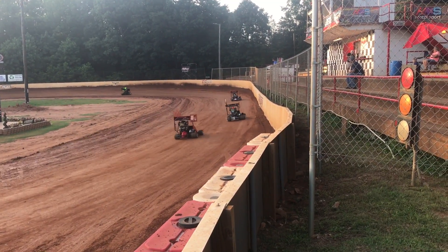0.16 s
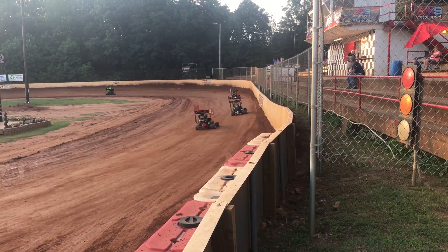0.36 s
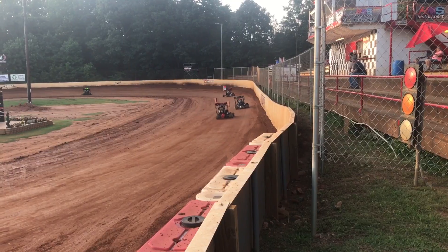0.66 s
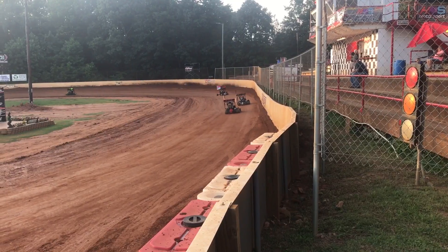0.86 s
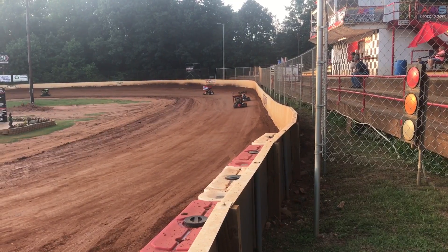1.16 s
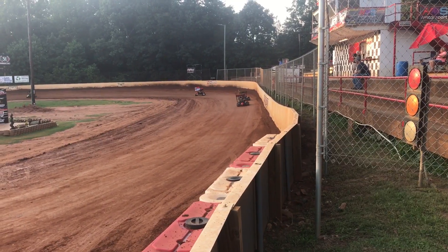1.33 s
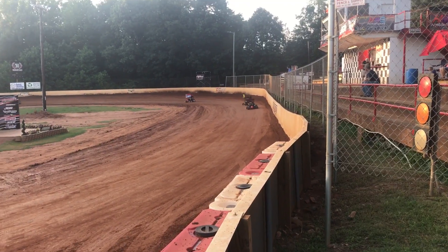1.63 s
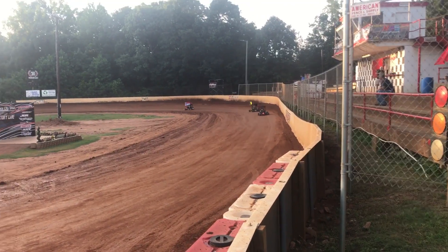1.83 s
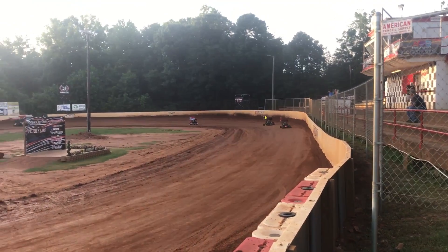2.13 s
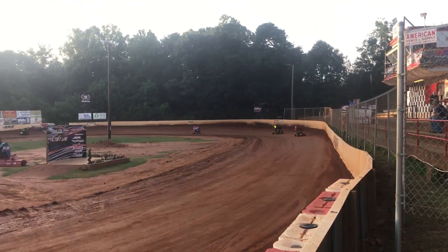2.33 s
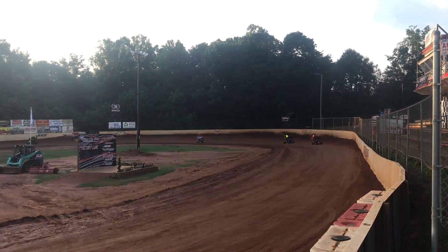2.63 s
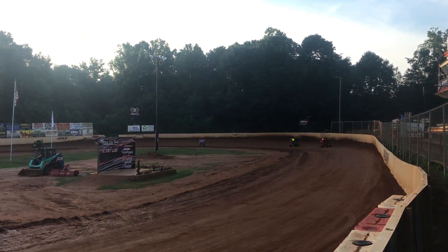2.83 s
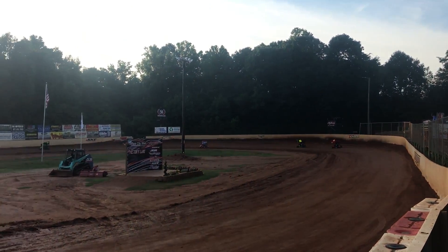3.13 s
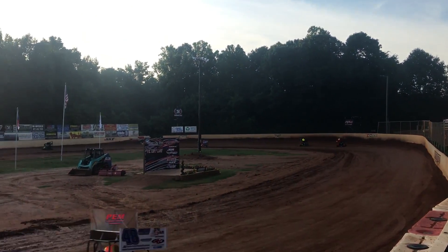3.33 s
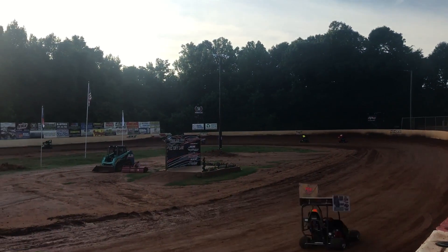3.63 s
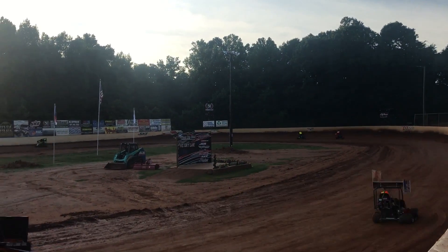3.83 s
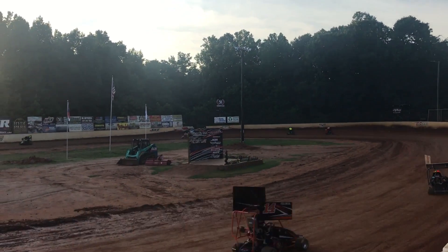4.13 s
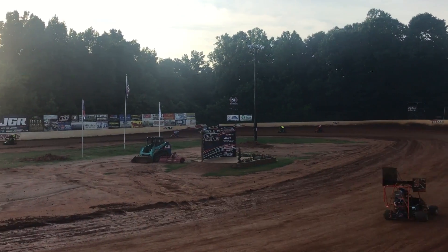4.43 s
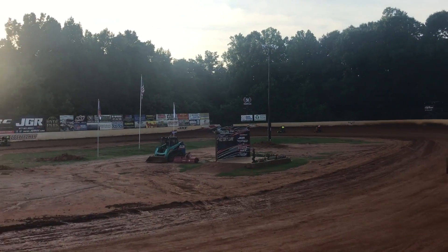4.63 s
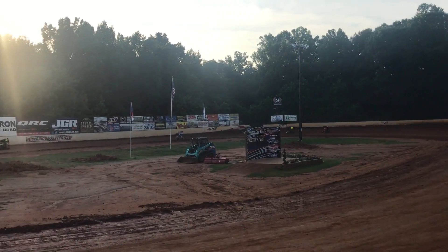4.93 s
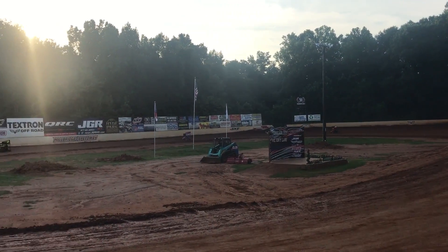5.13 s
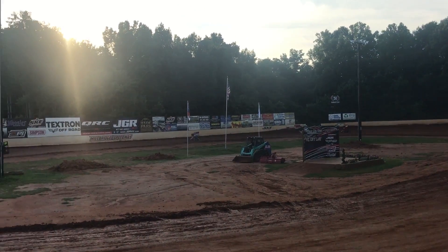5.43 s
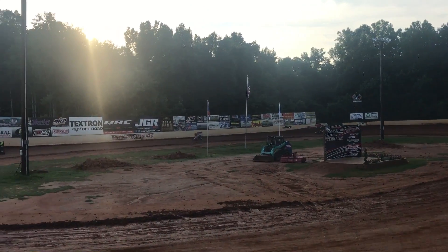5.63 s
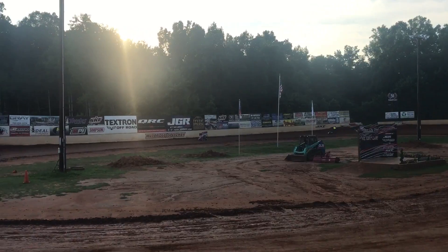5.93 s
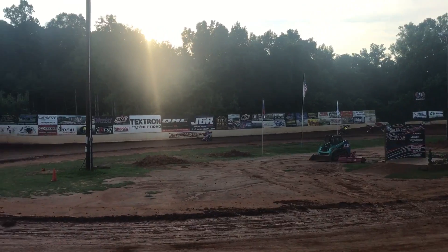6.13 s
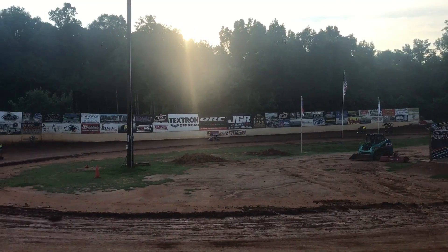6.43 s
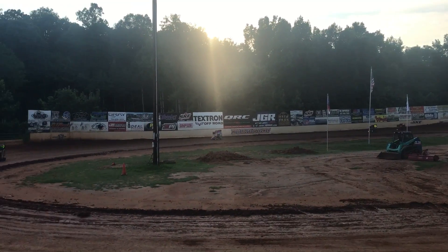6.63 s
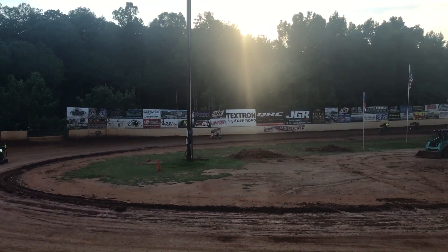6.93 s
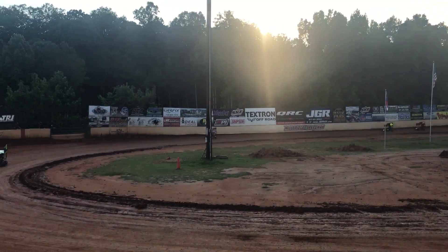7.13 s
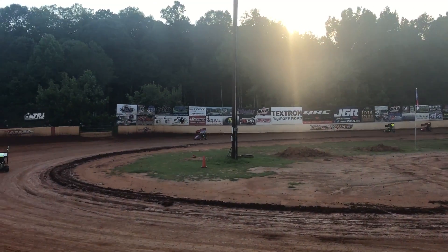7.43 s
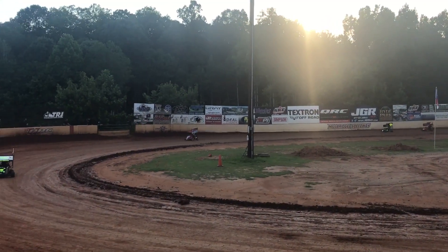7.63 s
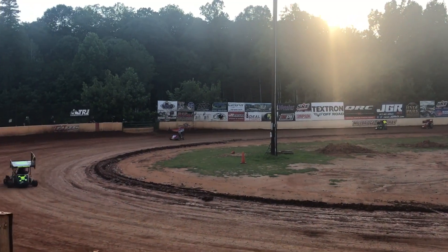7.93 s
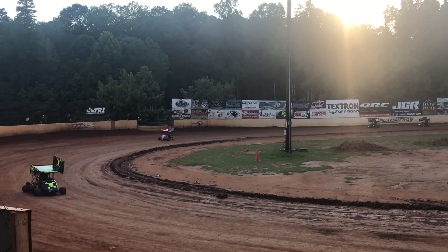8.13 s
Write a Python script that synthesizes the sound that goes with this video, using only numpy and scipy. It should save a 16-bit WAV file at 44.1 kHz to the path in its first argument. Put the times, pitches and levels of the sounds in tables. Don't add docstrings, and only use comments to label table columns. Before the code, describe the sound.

Harsh, rasping small-engine drone of karts lapping outdoors, swelling and easing as they pass the fence, abruptly cut by a short silent gap.

```python
import sys
import numpy as np
from scipy import signal
from scipy.io import wavfile
from scipy.ndimage import uniform_filter1d

SR = 44100
rng = np.random.default_rng(int(sys.argv[2]) if len(sys.argv) > 2 else 0)


def digitize_waveform(pressure):
    field = np.atleast_2d(pressure).T
    bounded = np.clip(field, -1, 1)
    quanta = np.round(bounded * 32767).astype(np.int16)
    wavfile.write(sys.argv[1], SR, quanta)


def to_linear_factor(level_db):
    exponent = np.asarray(level_db, float) / 20
    return 10 ** exponent


N = 365148
TIME = np.arange(N) / SR


def unit(x):
    return x / np.sqrt(np.mean(x ** 2) + 1e-20)


def drift(rate_hz, count=1, size=N):
    hop = 64
    r = np.exp(-2 * np.pi * rate_hz * hop / SR)
    noise = rng.standard_normal((count, N // hop + 1002))
    slow = signal.lfilter([1], [1, -2 * r, r * r], noise)[:, 1000:]
    return np.array([np.interp(np.arange(size) / hop, np.arange(len(s)), unit(s)) for s in slow])


def outdoors(x):
    dull = signal.lfilter([.1], [1, -.9], x)
    echoes = [(.041, -36), (.113, -32), (.237, -30.5)]   # lag/s, level/dB
    return x + sum(to_linear_factor(db) * np.interp(TIME - lag_s, TIME, dull) for lag_s, db in echoes)


def roar(jet, crack_db=8.0, low_share=0.32, patchy_db=2.0):
    # t/s, loudness/dB, closeness/dB
    pack = [(0, -24.5, 0), (.15, -29, 1.5), (.65, -22.5, -3.5), (1.02, -27, -2.5), (1.97, -20.5, -4),
            (2.2, -25.5, -1.5), (2.5, -26, -4), (2.85, -22, -5), (3.35, -18.5, -2), (3.55, -22, -1.5),
            (4.2, -22, -1.5), (4.5, -26.5, -0.5), (5.1, -25.5, -2), (5.66, -24.5, -2), (6.5, -27, -1.5),
            (7.3, -28.5, -5.5), (7.9, -28, -5.5), (8.28, -25.5, -4)]
    # level over loudness/dB, share of its swing/1, share of closeness/1
    band_rules = [(-1.5, 0.34, 0), (-0.5, 1, 0), (0.5, 0.51, 1.47), (-2.5, 0.88, 1.05), (-5, 1.05, 2.8)]
    roar_hz = [250, 1100, 5000, 9500, 15000]
    # f/Hz, level within its band/dB
    roar_shape = [(30, -21), (100, 2), (250, 7.5), (500, -4), (1300, -6), (2500, -8.5), (6400, -5.5),
                  (16000, -1)]
    # f/Hz, width/Hz, level/dB
    pipe_rings = [(2900, 1100, 2), (6100, 1200, 3), (1400, 500, -8)]
    air_share = .35
    plain_db = -5
    jet_evened = 0.3

    s, loud_db, close_db = np.transpose(pack)
    mean_db = loud_db.mean()
    levels_db = []
    for db, swing, share in band_rules:
        band_db = db + mean_db + swing * (loud_db - mean_db) + share * close_db
        levels_db.append(np.interp(TIME, s, band_db))

    shape_hz, shape_db = np.transpose(roar_shape)
    edges = 15 * 2 ** np.arange(0, 10.4, 1 / 3)
    white = rng.standard_normal((2, N))
    patches = drift(2.58, count=7)
    groups = np.zeros((5, N))
    for k, (low, high) in enumerate(zip(edges, edges[1:])):
        third = signal.butter(2, [low, high], "band", fs=SR, output="sos")
        band = signal.sosfilt(third, white[k % 2])
        place = np.log(low * high) / 2
        band = band * to_linear_factor(np.interp(place, np.log(shape_hz), shape_db) + patchy_db * patches[k % 7])
        for g in range(5):
            groups[g] += np.interp(place, np.log(roar_hz), np.arange(5) == g) * band

    out = 0
    for g, share in enumerate([0, low_share, 1, air_share, air_share]):
        steady = unit(groups[g])
        other = np.roll(steady, N // 3)
        rings = 0
        for hz, width_hz, db in pipe_rings:
            b, a = signal.iirpeak(hz, hz / width_hz, fs=SR)
            rings = rings + to_linear_factor(db) * signal.lfilter(b, a, other)
        burst = share * to_linear_factor(crack_db) ** 2 * jet
        mix = steady + np.sqrt(burst) * unit((g < 3) * rings + to_linear_factor(plain_db) * other)
        evened = np.sqrt(1 + jet_evened * uniform_filter1d(burst, size=6000))
        out = out + mix / evened * to_linear_factor(levels_db[g])
    return out


def puff(clicks, decay_s=0.00093, bounce_s=.0032, bounce=0.42):
    r = np.exp(-1 / (decay_s * SR))
    jet = signal.lfilter([1 - r], [1, -r], clicks + 1e-18)
    return jet + bounce * np.interp(TIME - bounce_s, TIME, jet)


def engine(speed, rows, fires_s):
    # multiple of the firing rate/1, level/dB
    low_orders = [(1, -4), (2, 6), (3, -2), (4, -4.5), (5, 3.5), (6, 2), (7, -17), (8, -8), (9, 1.5),
                  (10, -4.5), (11, -5), (12, -5.5)]
    # multiple of the firing rate/1, level/dB
    upper_orders = [(13, -17), (14, -13), (15, -16), (16, -18), (17, -16), (18, -8), (19, -12), (20, -8),
                    (21, -10), (22, -12), (23, -14), (24, -17)]
    # f/Hz, level/dB
    silencer = [(430, 2.5), (480, -2.5), (550, 1), (700, -2), (790, -11), (830, 0), (1000, 2), (1100, 1.5)]
    uneven_db, shimmer_db = 1.0, 1.8
    wander_db = .8
    straight_db_per_s, straight_db = 4.5, 9.0

    when, hz = np.transpose(speed)
    s, tone_db, crack_db = np.transpose(rows)
    near = (TIME > when[0] - .2) & (TIME < when[-1] + .2)
    t = TIME[near]
    fade = np.clip(np.minimum(t - when[0], when[-1] - t) / .2 + 1, 0, 1)

    rate = np.interp(t, when, hz)
    cycles = np.cumsum(rate) / SR
    cycles = cycles + .004 * drift(10, size=len(t))[0]
    cycles = cycles + 2 - np.interp(fires_s, t, cycles) % 1
    firing = cycles.astype(int)
    strength = to_linear_factor(uneven_db * rng.standard_normal(500))[firing]

    shimmer = drift(2, count=4, size=len(t)) + 1.1 * drift(16, count=4, size=len(t))
    slowest = np.argmin(hz)
    lift_db = (slowest > 1) * np.clip(straight_db_per_s * (t - when[slowest]), 0, straight_db)
    wave = 0
    for k, level_db in [*low_orders, *upper_orders]:
        order = round(k)
        upper = order > 12
        lag = .5 * rng.random()
        chamber_db = np.interp(order * rate, *np.transpose(silencer)) + upper * lift_db
        waver_db = shimmer_db * shimmer[order % 4] / (1 + upper)
        loudness = to_linear_factor(level_db + chamber_db + waver_db)
        wave = wave - loudness * np.cos(2 * np.pi * (order * cycles - lag))

    tone, clicks = np.zeros(N), np.zeros(N)
    wander = wander_db * drift(1.85, size=len(t))[0]
    tone[near] = unit(wave) * fade * to_linear_factor(np.interp(t, s, tone_db) + wander)
    fires = np.diff(firing, prepend=int(cycles[0])) > 0
    crack = strength * fade * to_linear_factor(np.interp(t, s, crack_db))
    clicks[near] = fires * crack ** 2 * SR / 46
    return tone, clicks


def scene():
    # t/s, firing rate f/Hz
    speeds = [
        [(0, 41.5), (1.02, 44.2)],
        [(0, 42.6), (2.0, 49.0), (2.4, 49.5), (2.6, 48.4)],
        [(0, 45.4), (1.0, 49.7)],
        [(0, 52.0), (.4, 52.1), (.8, 54.4), (1.0, 54.2)],
        [(1.96, 46.7), (2.45, 48.5), (2.65, 48.3)],
        [(2.6, 48.3), (2.8, 47.3), (3.22, 46.8), (3.83, 42.9), (4.24, 42.8), (5.06, 45.3), (5.6, 45.9),
         (6.7, 49.7)],
        [(3.0, 47.1), (3.4, 46.2), (4.01, 46.1), (4.7, 43.1), (5.63, 45.9), (6.03, 46.3), (6.84, 48.4),
         (7.1, 50.0), (7.65, 50.6)],
        [(4.4, 48.8), (4.61, 47.9), (5.87, 51.4), (6.5, 52.3)],
        [(5.5, 37.7), (6.36, 39.3), (6.6, 41.4), (7.64, 46.2), (8.28, 46.4)],
        [(7.0, 48.5), (7.64, 46.6), (8.28, 45.6)],
        [(7.1, 52.3), (7.6, 52.4), (8.28, 54.9)],
    ]
    fires_at = [.156, .6, .4, .3, 2.088, 3.438, 5.615, 5.0, 6.412, 8.0, 7.6]
    # t/s,
    # exhaust tone/dB, crack over the roar/dB
    near_early = [
        [(0, -25.5, -15.5), (.2, -19, -6), (.6, -24.5, -11), (1.02, -16.5, -20)],
        [(0, -25.5, -22.5), (.6, -24, -12.5), (2.0, -18.5, -17), (2.6, -23.5, -40)],
        [(0, -22, -21.5), (.5, -24, -10.5), (1.0, -22, -10.5)],
        [(0, -19.5, -14), (1.0, -29, -12.5)],
        [(1.96, -38, -6.5), (2.24, -22.5, -10), (2.65, -29, -19)],
    ]
    # t/s, exhaust tone/dB, crack over the roar/dB
    near_passing = [
        [(2.6, -24.5, -10.5), (2.8, -14, -9.5), (3.15, -23.5, -8.5), (3.55, -17.5, -8.5), (3.95, -26, -25),
         (4.6, -21.5, -20), (5.1, -18.5, -18), (5.6, -30.5, -22), (6.7, -38, -26)],
        [(3.0, -15.5, -15), (3.3, -13.5, -14), (3.79, -16.5, -10), (4.3, -17.5, -9), (5.0, -23, -9),
         (5.4, -18, -8), (5.8, -19.5, -6.5), (6.9, -23, -11.5), (7.65, -31, -16)],
    ]
    # t/s, exhaust tone/dB, crack over the roar/dB
    near_far = [
        [(4.4, -35, -34), (4.7, -25.5, -16), (5.4, -29, -17), (6.5, -29, -33)],
        [(5.5, -43.5, -29), (6.4, -27, -9), (7.1, -21, -46), (7.6, -27.5, -23), (8.28, -27, -27)],
        [(7.0, -27.5, -25), (7.64, -23.5, -31), (8.28, -23.5, -32)],
        [(7.1, -39, -33), (7.7, -25.5, -14.5), (8.28, -21, -17)],
    ]
    # t/s, half length/s, crack lift/dB
    barks = [
        (.15, .16, 4),
        (3.79, .04, 5),
        (5.6, .1, 9),
        (6.41, .04, 2),
        (6.9, .12, 3),
    ]

    karts = zip(speeds, [*near_early, *near_passing, *near_far], fires_at)
    tones, clicks = np.sum([engine(*kart) for kart in karts], axis=0)
    bark_db = sum(db * np.exp(-((TIME - s) / half_s) ** 2) for s, half_s, db in barks)
    jets = puff(clicks * to_linear_factor(2 * bark_db))
    return (outdoors(tones) + roar(jets))[None]


def band_limit(x):
    return signal.sosfilt(signal.butter(12, 16110, fs=SR, output="sos"), x)


def record(dry):
    # f/Hz, width/Hz, level/dB
    mic_dips = [(4980, 700, -3), (7670, 200, -2.5), (10700, 1300, -4.5)]
    # start t/s, end t/s
    dropout_s = (1.0327, 1.9597)
    limit, cutoff_hz = .85, 15830
    smear_s, smear_db = .023, -36

    x = signal.sosfilt(signal.butter(1, 24, "high", fs=SR, output="sos"), dry)
    for hz, width_hz, db in mic_dips:
        b, a = signal.iirpeak(hz, hz / width_hz, fs=SR)
        x = x + (to_linear_factor(db) - 1) * signal.lfilter(b, a, x)
    x = limit * x / (limit ** 4 + x ** 4) ** .25
    x = signal.sosfilt(signal.ellip(14, .3, 90, cutoff_hz, fs=SR, output="sos"), x)

    start, end = dropout_s
    edge = (TIME < start + smear_s) | (TIME > end - smear_s)
    dull = signal.sosfilt(signal.butter(4, 1400, fs=SR, output="sos"), x)
    heard = (TIME < start) | (TIME > end)
    x = x * heard + to_linear_factor(smear_db) * edge * dull
    return band_limit(x)


dry = scene()
out = record(dry)
digitize_waveform(out)
```